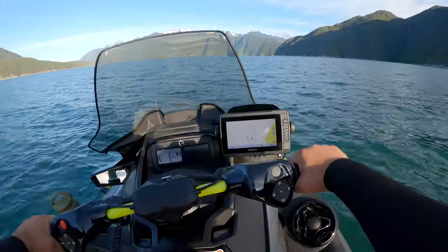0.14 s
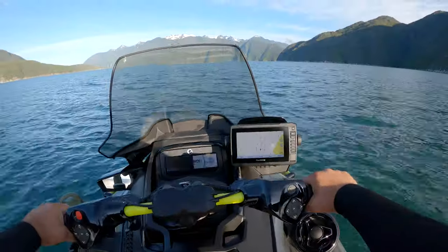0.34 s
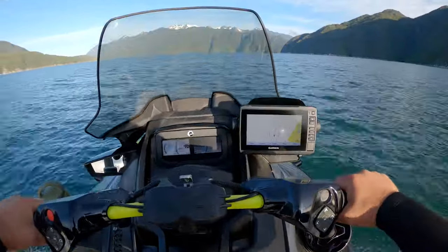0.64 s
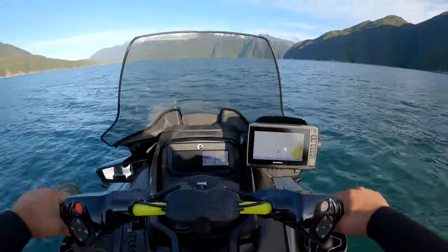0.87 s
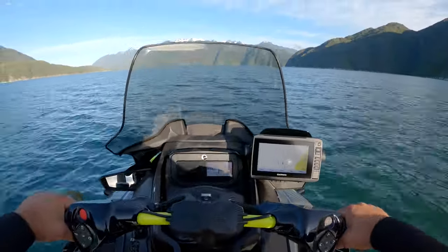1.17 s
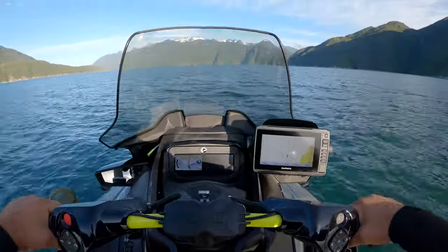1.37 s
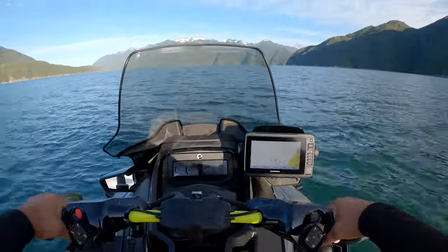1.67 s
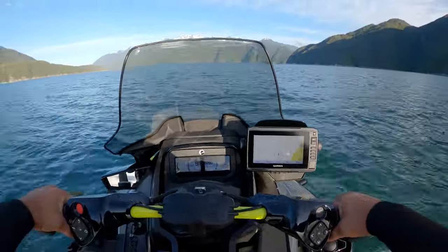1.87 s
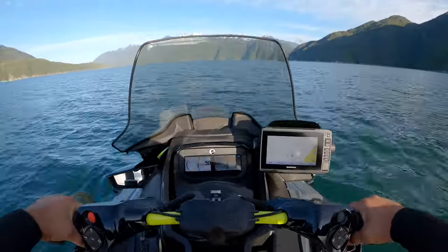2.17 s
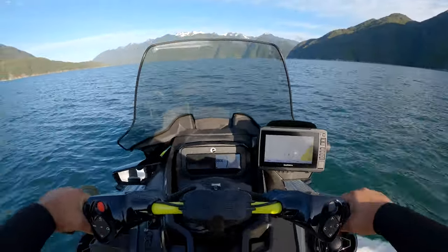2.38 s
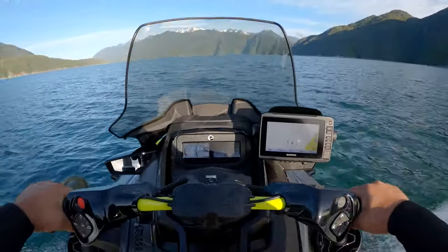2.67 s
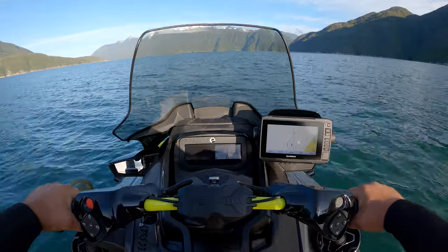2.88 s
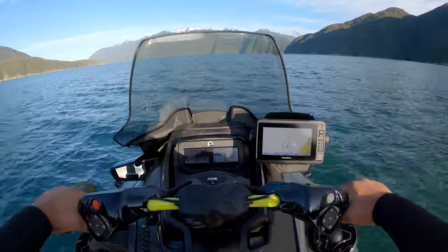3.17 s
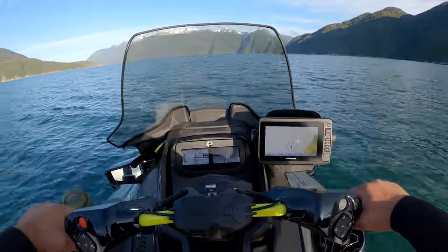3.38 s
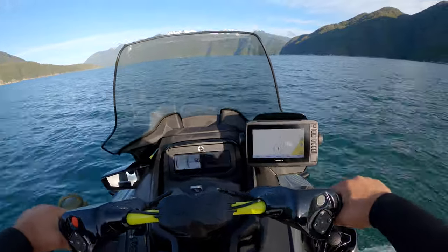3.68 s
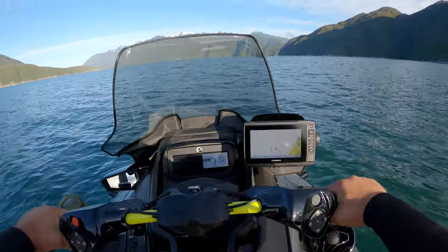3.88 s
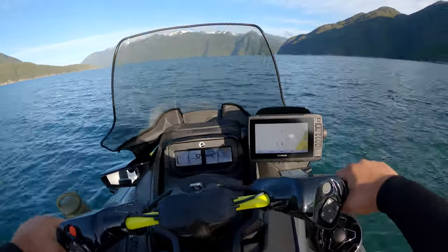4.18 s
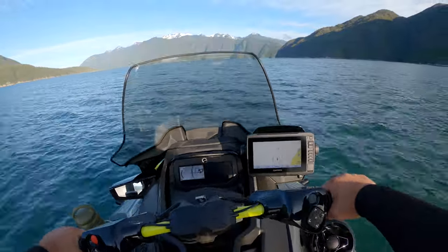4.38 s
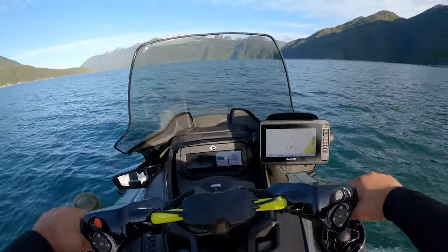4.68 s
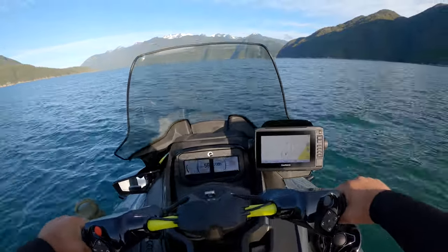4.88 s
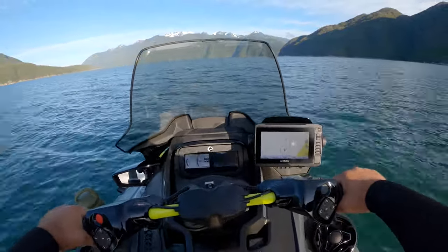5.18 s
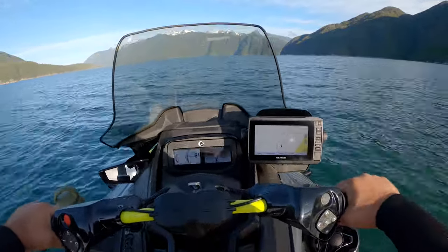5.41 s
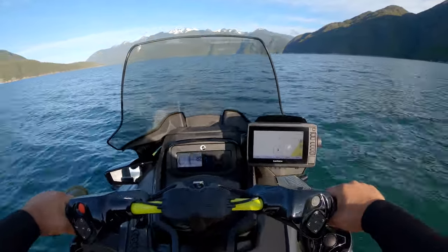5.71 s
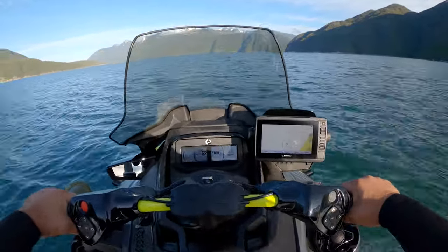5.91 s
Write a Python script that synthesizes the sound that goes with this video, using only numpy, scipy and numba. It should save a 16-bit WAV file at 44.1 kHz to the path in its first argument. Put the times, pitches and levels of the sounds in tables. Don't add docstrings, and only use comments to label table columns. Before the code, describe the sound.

A watercraft engine hums steadily over choppy water, fading in from near silence, with wind rumbling on the microphone and splashes slapping its housing.

```python
import sys
import numpy as np
from scipy import signal
from scipy.fft import rfft, irfft
from scipy.io import wavfile
from scipy.ndimage import uniform_filter1d
from numba import njit

SR = 44100
rng = np.random.default_rng(int(sys.argv[2]) if len(sys.argv) > 2 else 0)


def volts(x):
    e = np.asarray(x, float) / 20
    return 10 ** e


def to_wav(sig):
    pcm = np.clip(np.atleast_2d(sig), -1, 1) * 32767
    pcm = np.round(pcm).astype(np.int16)
    wavfile.write(sys.argv[1], SR, pcm.T)


N = 266805
TIME = np.arange(N) / SR

# time [s], engine cycle rate [Hz], share of the cruise colour [0-1],
# firing tone swell [dB] as the pump loads and unloads.
ENGINE_RUN = [(0, 55.53, 0.43, 0.5), (.55, 56.1, 0.39, -3.5), (.92, 56.18, 0.01, 6),
              (1.3, 56.23, 0.21, -8.5), (1.95, 57.06, 0.19, 6.5), (2.18, 57.23, 0.19, -7),
              (2.42, 57.53, 0.12, 4.5), (2.75, 57.68, 0.37, -11.5), (3.0, 58.17, 0.47, 1.5),
              (3.35, 58.22, 0.31, 1), (3.9, 57.98, 0.51, -0.5), (4.45, 58.61, 0.46, 2.5),
              (4.85, 58.3, 0.62, -2), (5.2, 59.42, 0.96, -3), (5.5, 58.91, 0.64, 3.5),
              (6.05, 59.93, 0.9, -3)]


def curves(table):
    s, *columns = np.transpose(table)
    return [np.interp(TIME, s, c) for c in columns]


def unit(x):
    return x / np.sqrt(np.mean(x ** 2))


def walk(rate):
    hold = int(SR / rate)
    levels = np.repeat(rng.standard_normal(N // hold + 1), hold)
    slewed = uniform_filter1d(uniform_filter1d(levels, hold), hold)
    return unit(slewed[:N])


def colour(x, points):
    hz, db = np.transpose(points)
    log_hz = np.log(np.maximum(np.arange(N // 2 + 1) * SR / N, 1))
    return irfft(rfft(x) * volts(np.interp(log_hz, np.log(hz), db)), N)


def patchy(points, shared, own_db, rate):
    whole = rfft(colour(rng.standard_normal(N), points))
    octave = np.log2(np.maximum(np.arange(N // 2 + 1) * SR / N, 1))
    lowest, highest = np.floor(np.log2(points[0][0])), np.log2(points[-1][0])
    out = 0
    for centre in np.arange(lowest, highest + .5, .5):
        band = irfft(whole * np.clip(1 - 2 * np.abs(octave - centre), 0, 1), N)
        out = out + band * volts(shared + own_db * walk(rate))
    return unit(out)


def mesh(x):
    return signal.sosfilt(signal.butter(8, 4800, fs=SR, output="sos"), x)


def bursts(table, below, above):
    out = np.zeros(N)
    t = np.arange(8192) / SR
    noise = rng.standard_normal((len(table), len(t)))
    for (s, db, length, hz), row in zip(table, noise):
        sos = signal.butter(2, [hz * below, hz * above], "band", fs=SR, output="sos")
        band = signal.sosfilt(sos, row)
        age = t / max(1.5 * length, .003)
        burst = unit(band) * age ** 2 * np.exp(1 - age ** 2) * volts(db)
        i = int(s * SR)
        out[i:i + len(t)] += burst[:N - i]
    return mesh(out)


@njit
def follow(x, attack, release):
    y, level = np.empty(len(x)), 0.
    for i in range(len(x)):
        level += (x[i] - level) * (attack if x[i] > level else release)
        y[i] = level
    return y


def calm_air():
    # frequency [Hz], level [dB per Hz].
    air_colour = [(10, -9), (40, 0.5), (180, -10), (430, -22), (1000, -28.5), (3000, -44), (6000, -45),
                  (13000, -56.5), (16000, -61.5)]
    cut_s, breath_s, breath_db, treble_hz = .142, .045, 7, 3000
    air = volts(-50.5) * unit(colour(rng.standard_normal(N), air_colour))
    treble = colour(air, [(treble_hz / 2, -30), (treble_hz, 0)])
    breath = np.exp(-((TIME - cut_s) / breath_s) ** 2) - .4
    air = air + treble * (volts(breath_db * breath) - 1)
    return air * np.clip((cut_s - TIME) / .002, 0, 1)


def engine():
    # order of the cycle, level while settling [dB], level at cruise [dB].
    order_levels = [(1, -14, -14.5), (2, -13, 0), (3, -1, 1.5), (4, -8, -13.5), (5, 2.5, -17), (6, 1, -3.5),
                    (7, -3.5, -24), (8, -8, -10.5), (9, -12, -14), (10, -3.5, -20.5), (11, -28.5, -21.5),
                    (12, -21, -16), (13, -27.5, -19), (15, -27.5, -16.5)]
    # time [s], swell [dB].
    pump_swell = [(0, -3.5), (.5, 2), (.9, 0), (1.3, -0.5), (1.7, -1), (2.1, 3.5), (2.5, -3), (2.9, 1.5),
                  (3.3, 1), (3.7, 2.5), (4.1, 4.5), (4.5, -0.5), (4.9, 3), (5.3, -5.5), (5.7, 1.5),
                  (6.05, -3.5)]
    pump_shares = {5: 0.52, 6: 0.49, 10: 1.0, 15: .9}
    # time [s], swell [dB].
    hull_swell = [(0, 0.5), (.75, 0), (1.0, -1.5), (1.3, -0.5), (1.7, -1.5), (1.95, 1), (2.3, 0), (2.52, 5),
                  (2.72, -5.5), (2.95, 0.5), (3.25, -3.5), (3.6, -1), (4.1, 0.5), (4.45, 5.5), (4.62, -4),
                  (5.0, 0.5), (5.7, 2), (6.05, -5.5)]
    hz, late, firing_db = curves(ENGINE_RUN)
    late = np.clip(late, 0, 1)
    pump_db, hull_db = curves(pump_swell)[0], curves(hull_swell)[0]
    settling = np.exp(-(TIME / 1.9) ** 2)
    relapse = .8 * np.exp(-((TIME - 5.37) / 0.3) ** 2)
    uneven_db = 7 * (settling + relapse - .5)
    angle = 2 * np.pi * np.cumsum(hz * (1 + 0.001 * walk(10))) / SR
    lean = -0.81
    out = 0
    for k, early_db, late_db in order_levels:
        db = early_db + late * (late_db - early_db) + 1.64 * walk(8)
        db = db + pump_shares.get(k, 0) * pump_db
        if k == 3:
            db = db + firing_db
        if k == 6:
            db = db + hull_db
        if k in (4, 7, 8, 9):
            db = db + uneven_db
        drawn_out = 0.12 * (k - 6) ** 2
        wander = 1.3 if k > 10 else 0.45 if k in pump_shares else .8
        out = out + volts(db) * np.sin(k * angle + lean + drawn_out + wander * walk(9))
    return out * volts(-5.5 + 1.5 * (1 - late)), angle


def gusts():
    # time [s], wind strength [dB].
    wind_strength = [(0, 7), (.5, 0.5), (.85, -2), (1.25, 4), (1.65, -12), (2.1, 3), (2.55, 4.5),
                     (3.0, -0.5), (3.3, 1), (3.55, -3.5), (3.85, 3.5), (4.15, -6), (4.6, 4), (5.05, 1),
                     (5.3, 3), (5.7, 0.5), (5.9, 3.5), (6.05, 0.5)]
    return curves(wind_strength)[0]


def buffets():
    # time the heave ends [s], strength [dB].
    heaves = [(.48, 1.5), (.8, 1.5), (1.22, 5), (1.42, 0), (1.84, 8), (2.05, 1), (2.542, 3.5), (2.65, 0),
              (2.78, -1), (3.081, 3.5), (3.22, 5), (3.391, 5.5), (3.5, 5), (3.86, 3), (4.3, 1), (4.48, -3),
              (4.628, 8), (4.779, 3), (5.06, 0.5), (5.212, 5), (5.349, 6), (5.5, -1.5), (5.66, 3),
              (5.88, 5), (5.981, 9)]
    heave_s, lull_s, lull_share = .05, 0.13, 0.58
    out = 0
    for s, db in heaves:
        age = TIME - s
        heave = np.exp(-(age / heave_s) ** 2)
        lull = -lull_share * np.exp(-(age / lull_s) ** 2)
        out = out + db * np.where(age < 0, heave, lull)
    return uniform_filter1d(out, size=SR // 100)


def waves():
    # time of the crest [s], swell [dB], rise [s], fall [s].
    crests = [(.25, -0.5, 0.18, .1), (.66, 10, 0.16, 0.15), (1.18, -0.5, .05, 0.07),
              (1.421, 5.5, 0.093, 0.1), (1.85, 5.5, 0.037, 0.069), (2.03, 8, 0.1, 0.11),
              (2.51, 10, 0.016, 0.034), (2.7, 4.5, 0.13, 0.19), (2.92, 3, 0.046, .06),
              (3.328, 5.5, 0.2, 0.08), (3.49, 5.5, 0.11, 0.14), (3.85, 1.5, 0.11, 0.24),
              (4.2, 5.5, 0.27, 0.21), (4.72, 4.5, 0.095, 0.23), (5.49, 6, 0.18, 0.042),
              (5.94, 5, 0.037, 0.076)]
    out = 0
    for s, db, rise, fall in crests:
        out = out + db * np.exp(-((TIME - s) / np.where(TIME < s, rise, fall)) ** 2)
    return out


def wind(rumble_db, roar_db, flap_db, angle):
    # frequency [Hz], level [dB per Hz].
    rumble_colour = [(8, -25), (15, -4), (40, -2), (80, -6), (130, -9.5), (220, -22.5)]
    roar_colour = [(50, -24), (100, -6.5), (170, -2), (260, -3), (400, -6.5), (600, -14), (800, -15.5),
                   (1200, -30.5), (1800, -46.5), (2600, -70)]
    flap_colour = [(700, -18), (1000, -4), (1300, -5), (1900, -15), (2550, -14), (3200, -20), (4200, -23),
                   (5600, -33.5), (7300, -45)]
    # time [s], swell of the roar's top [dB].
    churn_swell = [(0, 4), (.35, -0.5), (.8, -2.5), (1.2, 1.5), (1.7, -4), (2.05, 1.5), (2.4, -2),
                   (2.9, -1.5), (3.3, 0.5), (3.8, -0.5), (4.25, 0.5), (4.7, 1.5), (5.05, 2.5), (5.4, -3),
                   (5.8, 3.5), (6.05, 2.5)]
    buffet = walk(11)
    rumble = patchy(rumble_colour, 1.4 * buffet, own_db=1.5, rate=6.4)
    roar = patchy(roar_colour, 0.47 * buffet, own_db=1.2, rate=10)
    flap = patchy(flap_colour, 0.2 * buffet + 0.8 * walk(40), own_db=1.0, rate=20)
    knee_hz = 633
    top = colour(roar, [(knee_hz / 0.78, -40), (knee_hz, 0)])
    roar = roar + top * (volts(curves(churn_swell)[0]) - 1)
    roar = roar * (1 + 0.29 * np.sin(angle))
    return rumble * volts(rumble_db + 1.2) + roar * volts(roar_db + 0.5) + flap * volts(flap_db + 2.0)


def port(db):
    cavity_hz, width_hz = 2616, 500
    b, a = signal.iirpeak(cavity_hz, cavity_hz / width_hz, fs=SR)
    ring = signal.lfilter(b, a, signal.lfilter(b, a, rng.standard_normal(N)))
    return unit(ring) * volts(db + 2.1 * walk(30))


def spray(db):
    # frequency [Hz], level [dB per Hz].
    spray_colour = [(2500, -7.5), (4300, -3), (5600, -13), (7000, -17.5), (8500, -18.5), (10000, -27),
                    (12000, -35.5), (14300, -58)]
    fine = volts(2.0 * rng.exponential(size=N)) * rng.standard_normal(N)
    hiss = patchy(spray_colour, .7 * walk(25), own_db=.7, rate=35)
    return (hiss + 0.29 * unit(colour(fine, spray_colour))) * volts(db + 9.0)


def tears():
    # time [s], peak [dB].
    tear_hits = [(.213, -26), (.279, -16), (.195, -21), (.238, -21), (.363, -24), (1.633, -29),
                 (1.474, -31), (0.387, -18), (0.533, -16), (0.976, -26), (0.953, -19), (1.4, -17),
                 (2.018, -25), (2.06, -13), (2.138, -12.5), (2.171, -26), (2.457, -25), (2.527, -10),
                 (2.605, -15), (2.69, -20), (2.7132, -20), (2.783, -14), (3.067, -8), (3.174, -20),
                 (3.345, -17), (3.645, -21), (3.84, -9), (4.0, -24), (4.56, -23), (4.595, -11),
                 (4.6187, -11), (4.935, -20), (5.049, -6), (5.338, -10), (5.9636, -7)]
    length_s, centre_hz = 0.0026, 2150
    return volts(-8) * bursts([(s, db, length_s, centre_hz) for s, db in tear_hits], below=.33, above=1.45)


def slaps():
    # time [s], peak [dB].
    slap_hits = [(2.015, -8.5), (2.5, -20), (2.523, -8), (3.068, -9), (3.362, -8), (3.82, -8.5),
                 (5.046, -5), (5.336, -9.5), (4.931, -8.5), (5.2, -13), (5.852, -9), (5.868, -5),
                 (5.962, -5), (.2, -12), (.358, -14.5), (.59, -23), (.672, -20), (1.148, -17), (1.184, -19),
                 (1.797, -17), (2.166, -14), (2.412, -9.5), (2.68, -10), (2.713, -15), (3.505, -15),
                 (3.796, -16), (3.998, -12), (4.248, -13), (4.595, -13), (4.66, -14), (4.895, -10),
                 (5.555, -23), (5.604, -16), (5.778, -23), (5.793, -10)]
    length_s, centre_hz = 0.0075, 1430
    return volts(-7.0) * bursts([(s, db, length_s, centre_hz) for s, db in slap_hits], below=0.48, above=1.12)


def drops():
    # time [s], peak [dB], pitch [Hz], sharpness [pitch over bandwidth].
    drop_hits = [(0.2145, -16.0, 2280.0, 1.6), (0.2814, -20.0, 2580.0, 2.1), (0.3647, -20.0, 1980.0, 2.3),
                 (0.3936, -16.0, 2760.0, 1.1), (0.9533, -19, 2630.0, 1.6), (1.1549, -26, 3790.0, 3.7),
                 (1.1703, -26, 3620.0, 4.2), (1.4013, -19.5, 2630.0, 2.0), (1.7885, -24, 2200, 1.5),
                 (2.0633, -17.0, 3360.0, 2.8), (2.1411, -21.0, 3450.0, 3.3), (2.3262, -22.0, 3570.0, 3.2),
                 (2.3513, -22, 3790.0, 3.7), (2.3586, -24.0, 3320.0, 3.0), (2.3626, -18.0, 3360.0, 1.5),
                 (2.5023, -17.0, 3790.0, 3.7), (2.5093, -16.0, 3700.0, 1.8), (2.514, -20.0, 3060.0, 3.2),
                 (2.5243, -19.0, 3400.0, 3.0), (2.532, -4, 2540.0, 1.3), (2.5372, -26.0, 4090.0, 3.2),
                 (2.7867, -19.0, 3530.0, 2.6), (3.07, -18, 3490.0, 3.1), (3.08, -12, 2540.0, 1.4),
                 (3.3564, -15.0, 3400.0, 1.5), (3.3673, -15, 2110.0, 1.9), (3.3723, -20.0, 1850.0, 3.1),
                 (3.6527, -17.0, 3400.0, 1.9), (3.6811, -12, 2580.0, 1.4), (3.7844, -25, 3400.0, 3.6),
                 (3.8278, -23, 1850.0, 3.1), (3.8318, -23, 1810.0, 3.5), (3.8428, -11, 2930.0, 1.7),
                 (4.454, -19, 3790.0, 3.7), (4.5625, -20, 2400, 3), (4.6235, -13, 2540.0, 1.4),
                 (4.6834, -18, 3530.0, 3.4), (4.6929, -18.0, 4090.0, 1.9), (4.7093, -22.0, 3450.0, 3.3),
                 (5.0545, -9.0, 2540.0, 1.3), (5.2116, -21, 1850.0, 3.1), (5.3429, -14, 1980.0, 2.3),
                 (5.3509, -20, 3830.0, 2.3), (5.7819, -23.0, 4010.0, 2.7), (5.7893, -21.0, 3060.0, 3.2),
                 (5.858, -20.0, 3880.0, 3.8), (5.8976, -10.0, 3010.0, 1.5), (5.9385, -19.0, 3960.0, 2.3),
                 (5.9665, -12.0, 3530.0, 1.9), (6.0133, -21.0, 3960.0, 3.3)]
    ring_share = .55
    glide = .05
    out, t = np.zeros(N + 1024), np.arange(-256, 768) / SR
    for (s, db, hz, sharp), turn in zip(drop_hits, rng.random(len(drop_hits))):
        age = t * hz / (ring_share * max(sharp, .5))
        shape = np.exp(-age ** 2 / np.where(age < 0, 1, 2.5))
        cycles = hz * t * (1 + glide * age / 2) + turn
        i = int(s * SR) - 256
        out[i:i + len(t)] += volts(db) * shape * np.sin(2 * np.pi * cycles)
    return volts(2) * mesh(out[:N])


def puffs():
    # time [s], peak [dB], length [s], centre [Hz].
    puff_hits = [(1.137, -22.5, .011, 3095), (2.05, -21, 0.0082, 3500), (2.315, -27, 0.013, 3300),
                 (2.345, -22.5, 0.014, 3200), (2.493, -24, 0.0098, 3000), (2.518, -18, 0.0035, 3060),
                 (2.484, -20, .003, 2600), (2.507, -17, 0.0045, 2800), (3.075, -18, .005, 2500),
                 (5.026, -25, 0.0047, 2800), (5.047, -15, 0.004, 2596), (3.33, -18, 0.0055, 2496),
                 (3.395, -18.5, .006, 2600), (3.34, -17, 0.0097, 3130), (3.65, -20, 0.008, 2992),
                 (4.255, -21, 0.012, 2981), (4.69, -22, 0.016, 3200), (5.1, -21, 0.014, 3400),
                 (5.77, -19.5, .011, 2789), (5.852, -18, 0.0039, 3599), (5.893, -22, .002, 2700),
                 (5.932, -14, 0.0041, 3058), (6.006, -22, 0.0082, 3600), (1.165, -23, .005, 3200),
                 (1.18, -26, .012, 2680), (1.415, -24, 0.0091, 2600), (2.125, -27, 0.0054, 3300),
                 (3.665, -19, 0.015, 2500), (3.778, -21.5, 0.006, 2780), (4.003, -21, 0.011, 3500),
                 (4.05, -23, 0.0093, 2594), (4.288, -20.5, 0.0071, 3000), (4.449, -20.5, .004, 3602),
                 (5.075, -22, 0.014, 3598), (5.155, -27, .007, 2597), (4.865, -22, 0.0065, 2500),
                 (.585, -21, .009, 2300), (.68, -19, .008, 2580), (2.79, -25, 0.0097, 2470),
                 (3.175, -22, .012, 2600), (3.475, -22, .01, 2800), (5.98, -17, 0.0031, 3500),
                 (2.618, -17, 0.007, 2300), (4.845, -21, .016, 2500), (4.955, -19, .004, 2400),
                 (3.09, -24, .006, 3900)]
    return volts(-6.5) * bursts(puff_hits, below=.8, above=1.25)


def scene():
    gust_db, wave_db, buffet_db = gusts(), waves(), buffets()
    speed = curves(ENGINE_RUN)[0] - 58

    def driven(db, by_gust, by_wave, by_buffet, by_speed):
        return db + by_gust * gust_db + by_wave * wave_db + by_buffet * buffet_db + by_speed * speed

    flap_steady_db = -27.5
    rumble_db = driven(-8, 0.73, 0.061, 1, 0.8)
    roar_db = driven(-5, 0.071, 0.15, 0.56, 0.42)
    flap_db = driven(flap_steady_db, 0.37, 0.44, 0.44, 0.78)
    spray_db = driven(-52.5, .05, 1.25, .05, .1)
    port_db = -38 + .3 * (flap_db - flap_steady_db)
    hum, angle = engine()
    air = wind(rumble_db, roar_db, flap_db, angle) + port(port_db)
    water = spray(spray_db) + tears() + slaps() + drops() + puffs()
    return (hum + air + water)[None]


def roll_off(x):
    return signal.sosfilt(signal.butter(12, 15000, fs=SR, output="sos"), x)


def record(dry):
    threshold_db, ratio, attack_s, release_s = 3, 2.58, 0.0015, 0.06
    peak = follow(np.abs(dry[0]), 1 / (attack_s * SR), 1 / (release_s * SR))
    gain = np.minimum(volts(threshold_db) / (peak + 1e-9), 1) ** (1 - 1 / ratio)
    fade_from_s, fade_to_s = 0.093, 1.615
    fader = volts(-17) * np.clip((TIME - fade_from_s) / (fade_to_s - fade_from_s), 0, 1)
    x = dry * gain * fader + calm_air()
    x = x * np.clip((TIME[-1] - TIME) / .004 + .4, 0, 1)
    return roll_off(0.5 * np.tanh(x / 0.57))


dry = scene()
out = record(dry)
to_wav(out)
```